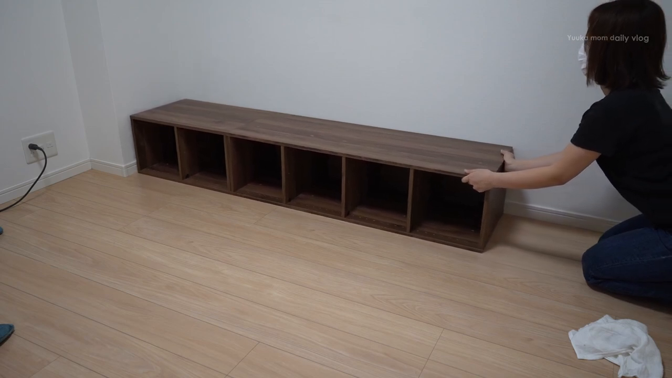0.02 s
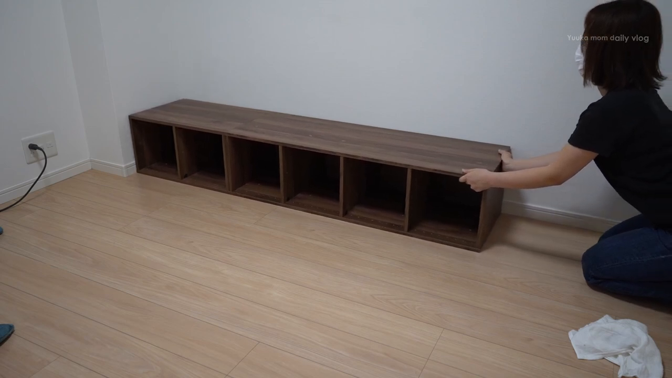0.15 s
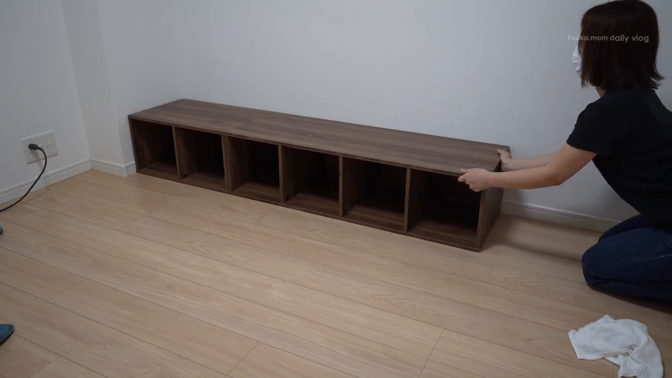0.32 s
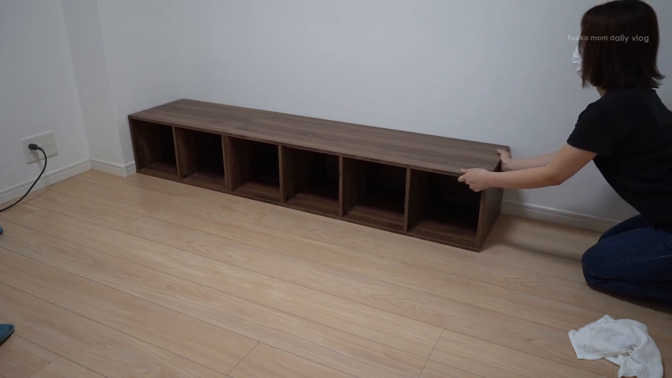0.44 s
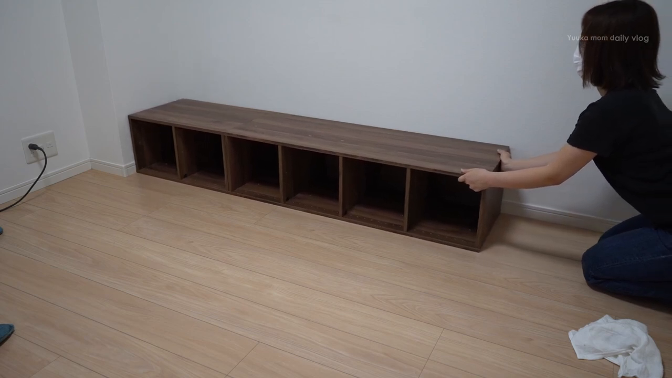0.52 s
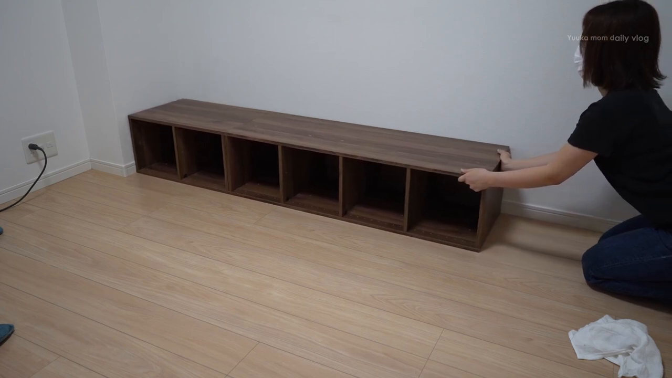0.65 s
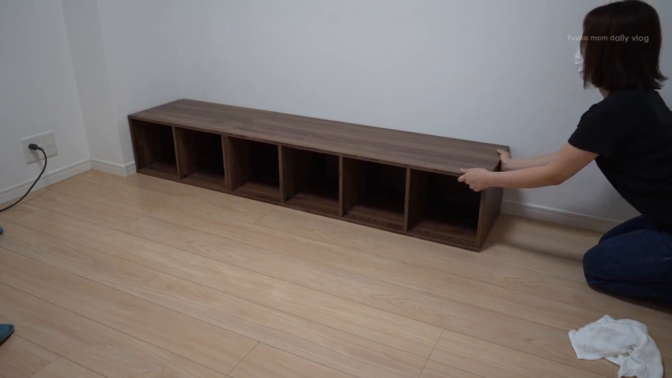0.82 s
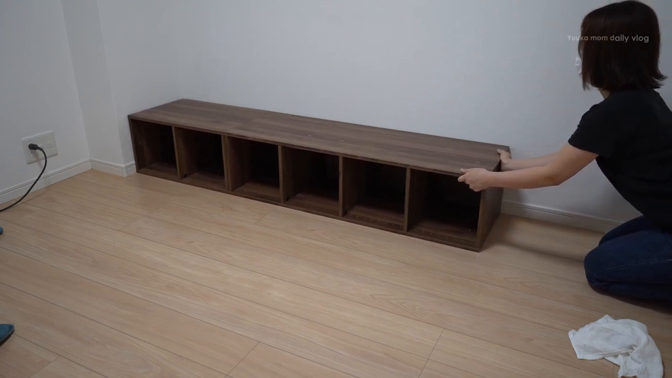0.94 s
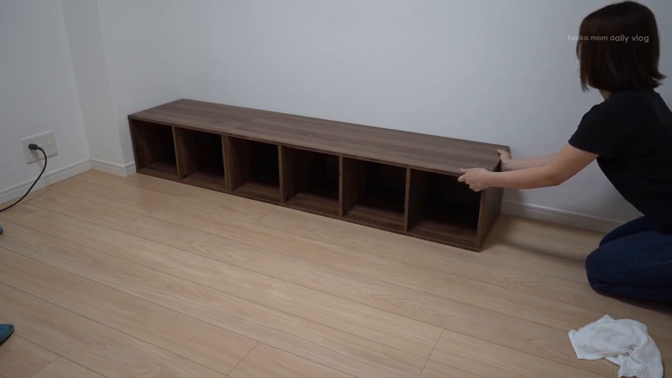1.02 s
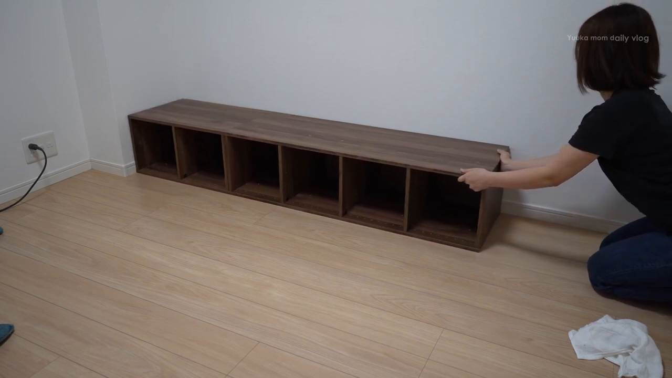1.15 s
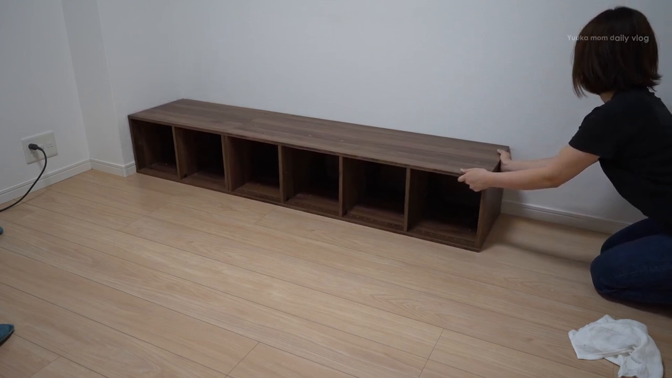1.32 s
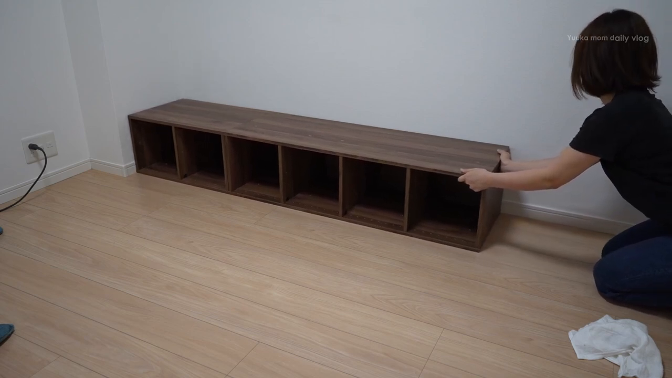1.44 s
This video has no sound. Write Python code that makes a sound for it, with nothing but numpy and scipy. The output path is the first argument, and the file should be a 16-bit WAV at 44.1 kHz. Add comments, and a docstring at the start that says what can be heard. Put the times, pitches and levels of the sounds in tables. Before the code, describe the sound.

A wooden shelf scrapes across a hard floor, knocks sharply to a stop, then slides on softly

```python
"""A long, low wooden shelf is pushed over a hard floor in a small, bare bedroom.
Friction is random tiny slips: hissing pushes, light scuffs and a low rub through panel resonances.
Half-sine contacts ring the panel modes as it knocks to a stop, rattles, then slides on, bumping softly.
The knock adds noise cracks and a deep floor thud; the second push adds short stick-slip groans.
Decaying noise bands make the room answer, over faint air and a low hum."""
import sys
import numpy as np
from scipy import signal
from scipy.fft import rfft, irfft
from scipy.io import wavfile
from scipy.ndimage import uniform_filter1d

SR = 44100
rng = np.random.default_rng(int(sys.argv[2]) if len(sys.argv) > 2 else 0)


def wav_record(signal):
    """Record a signal, one row per channel, as 16-bit PCM in the file named by sys.argv[1]."""
    frames = np.transpose(np.atleast_2d(signal))
    bounded = np.clip(frames, -1, 1)
    # unit amplitude maps onto the largest positive 16-bit level
    quanta = np.round(bounded * 32767).astype(np.int16)
    wavfile.write(sys.argv[1], SR, quanta)


N = 63945
FFT_SIZE = 73728

# still air: freq_hz, density_db (per Hz)
AIR_SPECTRUM = [(20, -6.5), (35, -13), (58, 1.5), (95, -12.5), (200, -2), (400, -12), (800, -14),
                (2000, -19.5), (6000, -29.5), (15500, -29.5)]
AIR_DB, HUM_HZ, HUM_DB = -67.5, 59, -77  # rms levels

# first push: time_s, level_db
FIRST_PUSH = [(0, -43), (.05, -49.5), (.1, -47.5), (.17, -50.5), (.218, -47.5), (.26, -110)]
# second push: time_s, level_db
SECOND_PUSH = [(.73, -110), (.77, -68), (.8, -70), (.9, -62.5), (1.0, -59), (1.1, -58), (1.28, -56.5),
               (1.41, -54), (1.45, -55)]
# hiss of first push: freq_hz, density_db (per Hz)
FIRST_HISS = [(100, -15), (300, -15), (700, -5), (1200, -1), (1600, 2), (2300, -1), (2800, 1), (4300, -6.5),
              (8000, -10), (12000, -19.5), (15500, -22.5)]
# hiss of second push: freq_hz, density_db (per Hz)
SECOND_HISS = [(100, -17), (500, -12.5), (1000, -7.5), (1400, -5.5), (2000, -1), (3300, -0.5), (5000, -1.5),
               (8500, -4), (12000, -11), (15500, -16.5)]
SLIDE_ROOM_DB = -0.5  # room relative to direct friction
GRAINS_PER_S, GRAIN_SPREAD_DB, FLUTTER_DB = 16000, 2, 0.5

# rubbing of the base: time_s, level_db
RUB_LEVEL = [(0, -64), (.2, -62.5), (.3, -82), (.6, -74.5), (.64, -66), (.75, -63.5), (.85, -65.5),
             (1.05, -66), (1.14, -63), (1.24, -65), (1.31, -61.5), (1.45, -69.5)]
# resonances under rubbing: freq_hz, width_hz, level_db
RUB_MODES = [(155, 16, -7.5), (188, 12, 0), (226.5, 10.4, -1.5), (330.7, 36, 1.5), (364, 19, -11),
             (508, 196, -8)]
RUB_TOP_HZ = 1120

# contacts of the knock: start_s, ring_db, crack_db, contact_ms
KNOCKS = [(0.2165, -18, -5, 0.93), (.219, -9, -3.5, 0.68), (.2238, -2.5, 2, 0.66), (0.2287, -4, -1, 0.75),
          (0.2348, -8, -14.5, 0.85), (0.2563, -1, -8.5, 1.45), (.277, -13, -19, 1.53), (0.288, -12, -23, 3)]
# soft bumps of the sliding base: start_s, level_db, contact_ms
BUMPS = [(.622, -32, 1.2), (0.768, -27, 0.95), (0.7854, -23.5, 2.2), (1.098, -27, 2.6)]
# shelf modes: freq_hz, level_db, t60_s
SHELF_MODES = [(148.4, -2, 0.262), (185.3, -7, 0.23), (213.6, 0, .3), (289.3, -1.5, 0.22),
               (346.8, -1.5, 0.32), (377.1, -7, 0.31), (450, -9, 0.23), (520, -14.5, 0.35),
               (573, -12.5, .3), (648, -6.5, 0.19), (677, -4, 0.37), (719.3, -8, .46), (800, -14, 0.34)]
RING_DB, RING_ROOM_DB = -33, -10
RING_LOW_HZ, RING_TOP_HZ = 121, 1060  # band the panels radiate

# wood-on-wood crack: freq_hz, density_db (per Hz)
CRACK_SPECTRUM = [(40, -35), (110, -10.5), (300, 6), (700, -0.5), (1100, -4.5), (1400, -5), (1900, -7),
                  (2700, -11.5), (3600, -15), (5500, -20), (8500, -21.5), (15500, -26)]
CRACK_DB, CRACK_DECAY_S, CRACK_ROOM_DB = -28, 0.0046, 2

# shelf drops onto the floor
THUD_START_S, THUD_HZ, THUD_T60_S, THUD_DB = 0.217, 72.5, 0.13, -39.5

# scuffs as the shelf is gripped and shifted: start_s, length_s, attack_s, level_db, bright_hz, boost_db
SCUFFS = [(0.618, 0.017, .005, -63, 9300, 5.5), (0.635, .04, 0.007, -69, 6940, 8),
          (.68, 0.19, .01, -71, 3000, 1), (0.757, 0.12, 0.046, -60.5, 14000, 15.5)]
# common scuff hiss: freq_hz, density_db (per Hz)
SCUFF_HISS = [(200, -2), (1000, 4.5), (3000, 1), (5000, -6.5), (9000, -8), (13000, -12.5), (15500, -15.5)]
SCUFF_RELEASE_S, SCUFF_WIDTH_OCT = 0.013, 0.71  # 1/e time, 1/e half-width

# stick-slip groans: start_s, rise_s, fall_s, pitch_hz, level_db
GROANS = [(0.778, 0.014, 0.018, 201, -46), (0.814, 0.0078, 0.022, 201, -55.5),
          (.853, 0.012, 0.031, 207, -54.5), (1.091, 0.029, 0.053, 176, -63.5),
          (1.151, 0.065, .04, 186.4, -58.5), (1.255, 0.015, 0.022, 185, -57)]
GROAN_WOBBLE, GROAN_OVERTONE_DB = 0.037, -18  # wobble: rms fraction of pitch

# room decay: freq_hz, t60_s
ROOM_DECAY = [(80, 0.41), (250, 0.29), (700, .56), (2000, .54), (6000, .48), (14000, 0.38)]
ROOM_BUILD_S = 0.00094
# likeness of the two channels: freq_hz, likeness (0-1)
LIKENESS = [(60, 1), (150, 0.98), (250, 1), (500, 0.85), (1000, 0.57), (2000, 0.15), (4000, 0),
            (15000, 0.2)]
# left minus right at the microphones: freq_hz, difference_db
BALANCE = [(200, 0.5), (700, -1.6), (1300, -1.6), (2400, -0.9), (4400, -.4), (8100, -3.5), (12000, -1.5),
           (15000, 2.5)]
TOP_HZ = 15760


def undb(db):
    """Decibels to amplitude gain."""
    return 10 ** (np.asarray(db) / 20)


def unit(x):
    """Scale to rms 1."""
    return x / np.sqrt(np.mean(x ** 2) + 1e-20)


def times():
    """Time of every sample, in seconds."""
    return np.arange(N) / SR


def bins():
    """Frequency of every spectrum bin, in Hz."""
    return np.fft.rfftfreq(FFT_SIZE, 1 / SR)


def over_hz(points, hz):
    """Interpolate a table on a log-frequency axis."""
    freq_hz, value = np.array(points, float).T
    return np.interp(np.log(np.maximum(hz, 1)), np.log(freq_hz), value)


def curve(points):
    """Gain over time from (time_s, level_db) points."""
    return undb(np.interp(times(), *np.array(points, float).T))


def colour(x, gain_db):
    """Minimum-phase filter with the given gain at every bin."""
    cepstrum = irfft(np.log(undb(gain_db)))
    # fold to the causal half
    cepstrum[1:FFT_SIZE // 2] *= 2
    cepstrum[FFT_SIZE // 2 + 1:] = 0
    response = np.exp(rfft(cepstrum))
    return irfft(rfft(x, FFT_SIZE) * response)[..., :N]


def shaped(x, gain_db):
    """Colour a white sound and keep its power."""
    return colour(x, gain_db) / np.sqrt(np.mean(undb(gain_db) ** 2))


def convolve(x, response):
    """Pass a sound through an impulse response."""
    full = signal.fftconvolve(np.atleast_2d(x), np.atleast_2d(response), axes=-1)
    return full[:, :N]


def spread(pair):
    """Mix two unrelated sounds to left and right, alike in the bass."""
    likeness = np.clip(over_hz(LIKENESS, bins()), -0.9, 0.999)
    weights = np.sqrt(np.array([1 + likeness, 1 - likeness]) / 2)
    mid, side = rfft(pair, FFT_SIZE) * weights
    return irfft(np.array([mid + side, mid - side]))[:, :N]


def wander():
    """Smooth random wavering of rms 1."""
    once = uniform_filter1d(rng.standard_normal(N), size=700)
    return unit(uniform_filter1d(once, size=700))


def lag(power, seconds):
    """Power builds up and dies away with one time constant."""
    keep = np.exp(-1 / (seconds * SR))
    return signal.lfilter([1 - keep], [1, -keep], power)


def reflections(power):
    """Diffuse room sound fed by a source power; each band dies away at its own rate."""
    noise = rfft(spread(rng.standard_normal((2, N))), FFT_SIZE)
    centres_hz = [hz for hz, _ in ROOM_DECAY]
    arriving = lag(power, ROOM_BUILD_S)
    out = 0
    for (_, t60_s), share in zip(ROOM_DECAY, np.eye(len(ROOM_DECAY))):
        band_gain = over_hz(list(zip(centres_hz, share)), bins())
        band = irfft(noise * band_gain)[:, :N]
        power_decay_s = t60_s / np.log(1000) / 2
        out = out + band * np.sqrt(lag(arriving + 1e-18, power_decay_s))
    return out


def friction():
    """Countless tiny slips of uneven size, fluttering with the pressure."""
    happens = rng.random((2, N)) < GRAINS_PER_S / SR
    slips = happens * rng.standard_normal((2, N))
    sizes = undb(GRAIN_SPREAD_DB * rng.standard_normal((2, N)))
    return spread(unit(slips * sizes)) * undb(FLUTTER_DB * wander())


def scrape(envelope, spectrum_db):
    """Friction of a given strength and colour, with its room sound."""
    wet = undb(SLIDE_ROOM_DB)
    direct = envelope * friction()
    room = wet * reflections(envelope ** 2)
    return shaped(direct + room, spectrum_db) / np.hypot(1, wet)


def contact(start_s, contact_ms):
    """Half-sine push of unit area: the longer, the softer."""
    age = (times() - start_s) / (contact_ms / 1000)  # in contact lengths
    push = np.sin(np.pi * np.clip(age, 0, 1)) * (age < 1)
    return push / (push.sum() + 1e-12)


def still_air():
    """Faint coloured room noise and a low sine hum."""
    noise = spread(rng.standard_normal((2, N)))
    air = unit(shaped(noise, over_hz(AIR_SPECTRUM, bins())))
    hum = np.sqrt(2) * np.sin(2 * np.pi * HUM_HZ * times())
    return undb(AIR_DB) * air + undb(HUM_DB) * hum


def sliding():
    """Base friction hisses over the floor in two pushes."""
    first = scrape(curve(FIRST_PUSH), over_hz(FIRST_HISS, bins()))
    second = scrape(curve(SECOND_PUSH), over_hz(SECOND_HISS, bins()))
    return first + second


def rubbing():
    """Friction of the dragging base makes the panel resonances drone."""
    f = np.maximum(bins(), 1)
    response = 0
    for hz, width_hz, db in RUB_MODES:
        response = response + undb(db) / (1 + 1j * hz / width_hz * (f / hz - hz / f))
    response = response / (1 + (f / RUB_TOP_HZ) ** 2)
    drone = irfft(rfft(friction(), FFT_SIZE) * response)[:, :N]
    return curve(RUB_LEVEL) * unit(drone)


def shelf_ring():
    """Contact forces excite decaying panel modes, radiated in a limited band."""
    t = times()
    force = sum(undb(db) * contact(s, ms) for s, db, _, ms in KNOCKS)
    force = force + sum(undb(db) * contact(s, ms) for s, db, ms in BUMPS)
    body = 0
    for hz, db, t60_s in SHELF_MODES:
        decay = np.exp(-np.log(1000) * t / t60_s)
        body = body + undb(db) * np.cos(2 * np.pi * hz * t) * decay
    radiated = signal.butter(2, [RING_LOW_HZ, RING_TOP_HZ], "bandpass", fs=SR, output="sos")
    ring = undb(RING_DB) * signal.sosfilt(radiated, convolve(force, body))
    room_response = reflections(signal.unit_impulse(N))
    return ring + undb(RING_ROOM_DB) * convolve(ring, room_response)


def knock_crack():
    """Each knock contact gives a short decaying noise crack that fills the room."""
    t = times()
    power = 0
    for start_s, _, crack_db, _ in KNOCKS:
        decay = (t >= start_s) * np.exp(-np.abs(t - start_s) / CRACK_DECAY_S)
        power = power + (undb(crack_db) * decay) ** 2
    direct = np.sqrt(power) * friction()
    room = undb(CRACK_ROOM_DB) * reflections(power)
    return undb(CRACK_DB) * shaped(direct + room, over_hz(CRACK_SPECTRUM, bins()))


def floor_thud():
    """Floorboards give one short, deep decaying sine."""
    age_s = np.maximum(times() - THUD_START_S, 0)
    decay = np.exp(-np.log(1000) * age_s / THUD_T60_S)
    return undb(THUD_DB) * np.sin(2 * np.pi * THUD_HZ * age_s) * decay


def scuffs():
    """Short, light friction bursts, each with its own boosted region."""
    t, out = times(), 0
    for start_s, length_s, attack_s, db, bright_hz, boost_db in SCUFFS:
        attack = np.clip((t - start_s) / attack_s, 0, 1)
        release = np.exp(-np.maximum(t - start_s - length_s, 0) / SCUFF_RELEASE_S)
        octaves = np.log2(np.maximum(bins(), 1) / bright_hz)
        bell = np.exp(-(octaves / SCUFF_WIDTH_OCT) ** 2)
        spectrum_db = over_hz(SCUFF_HISS, bins()) + boost_db * bell
        out = out + scrape(undb(db) * attack * release, spectrum_db)
    return out


def groans():
    """Stick-slip locks briefly onto a low panel resonance: wobbling tone plus octave."""
    t, out = times(), 0
    for start_s, rise_s, fall_s, hz, db in GROANS:
        pitch_hz = (t >= start_s) * hz * (1 + GROAN_WOBBLE * wander())
        phase = 2 * np.pi * np.cumsum(pitch_hz) / SR
        peak_s = start_s + rise_s
        envelope = np.interp(t, [start_s, peak_s, peak_s + fall_s], [0, 1, 0])
        tone = np.sin(phase) + undb(GROAN_OVERTONE_DB) * np.sin(2 * phase)
        out = out + undb(db) * np.sqrt(2) * envelope * tone
    return out


def scene():
    """All sources in one room."""
    knock = shelf_ring() + knock_crack() + floor_thud()
    return still_air() + sliding() + rubbing() + knock + scuffs() + groans()


def record(dry):
    """Two microphones differ slightly in colour; a steep low-pass cuts the top."""
    lean_db = over_hz(BALANCE, bins()) / 2
    heard = np.array([colour(dry[0], lean_db), colour(dry[1], -lean_db)])
    low_pass = signal.ellip(12, 0.1, 80, TOP_HZ, fs=SR, output="sos")
    return signal.sosfilt(low_pass, heard)


dry = scene()
out = record(dry)
wav_record(out)
```